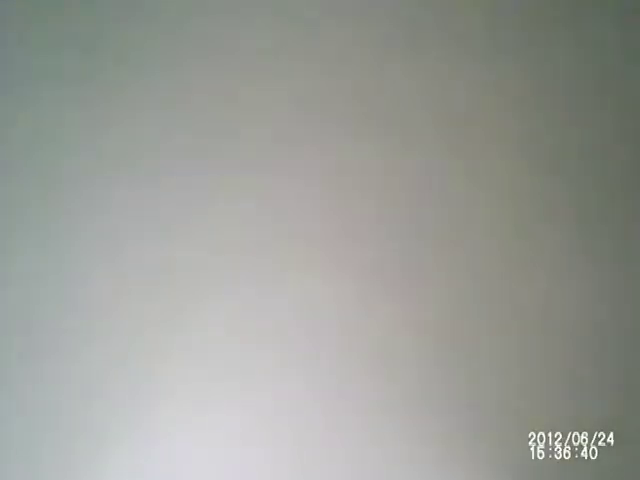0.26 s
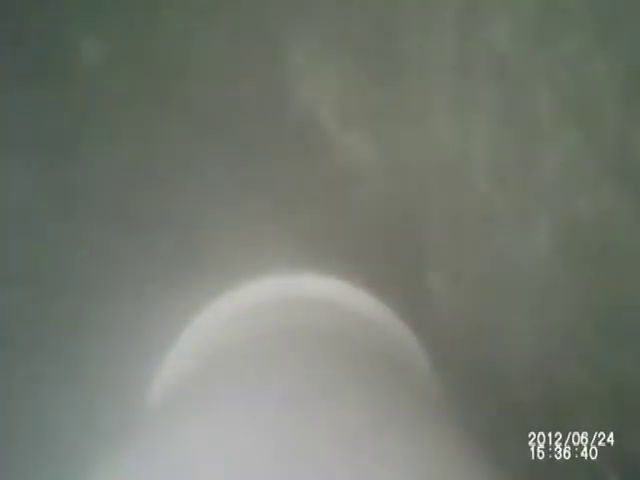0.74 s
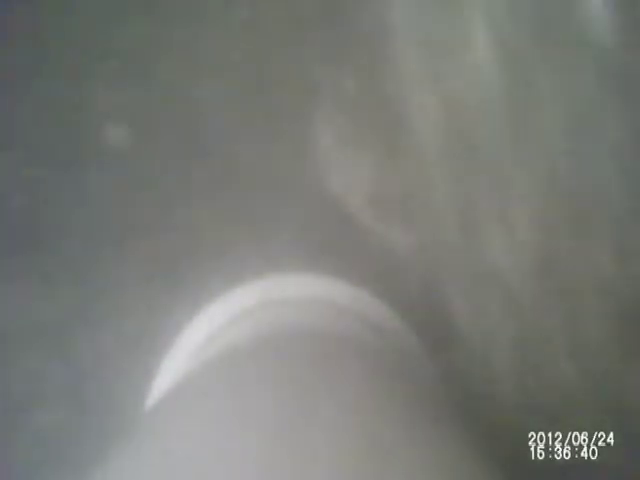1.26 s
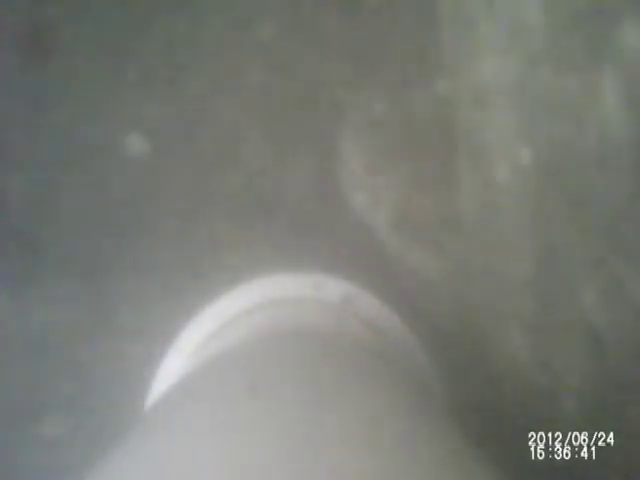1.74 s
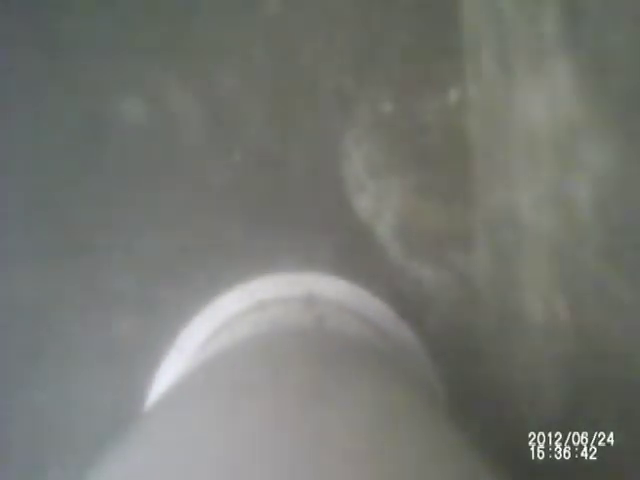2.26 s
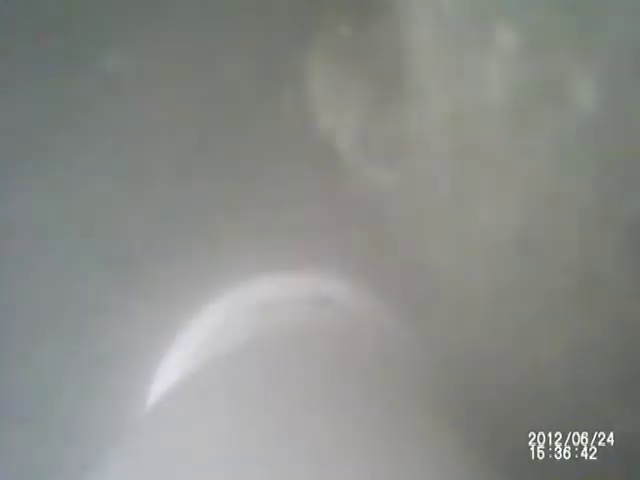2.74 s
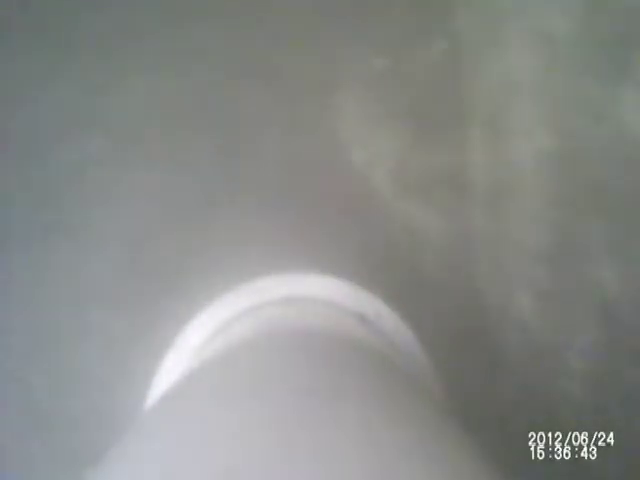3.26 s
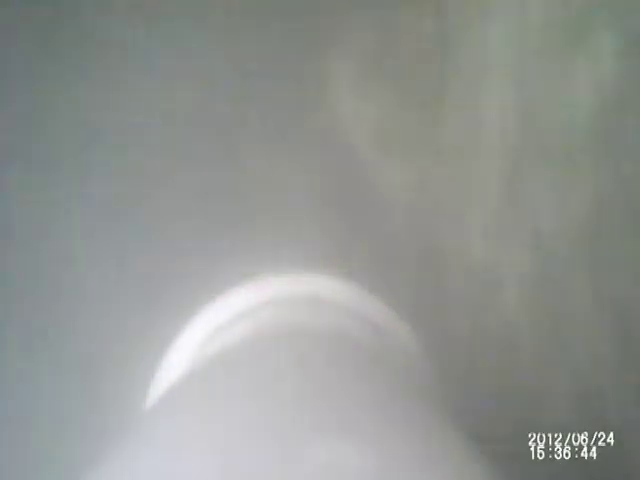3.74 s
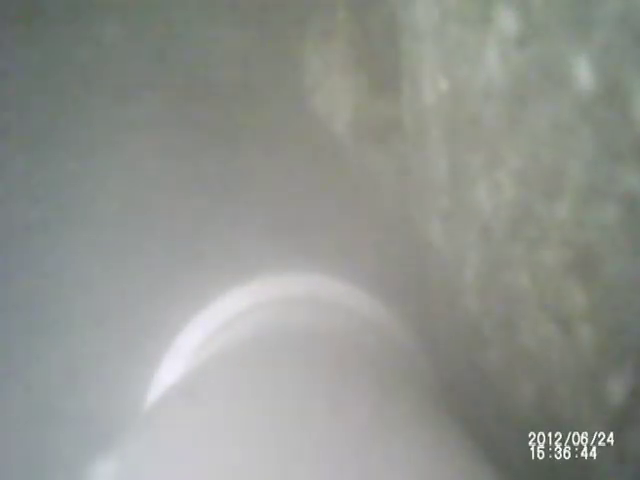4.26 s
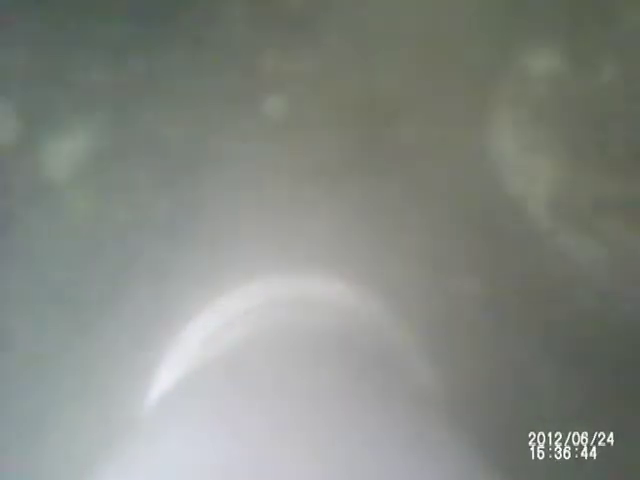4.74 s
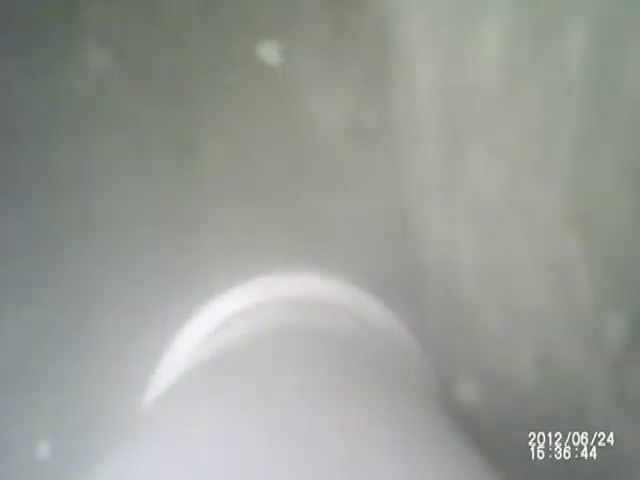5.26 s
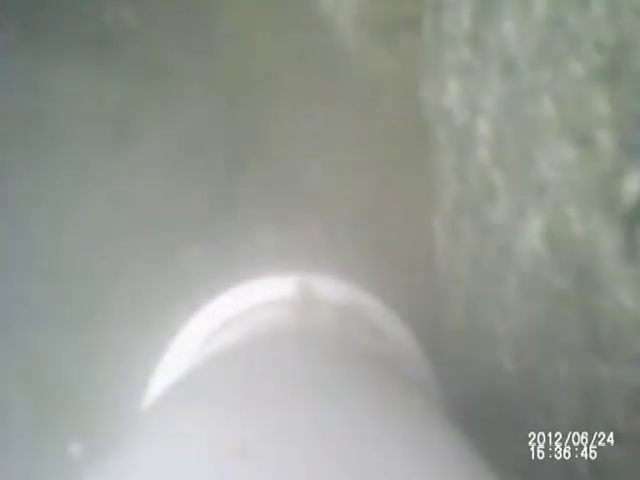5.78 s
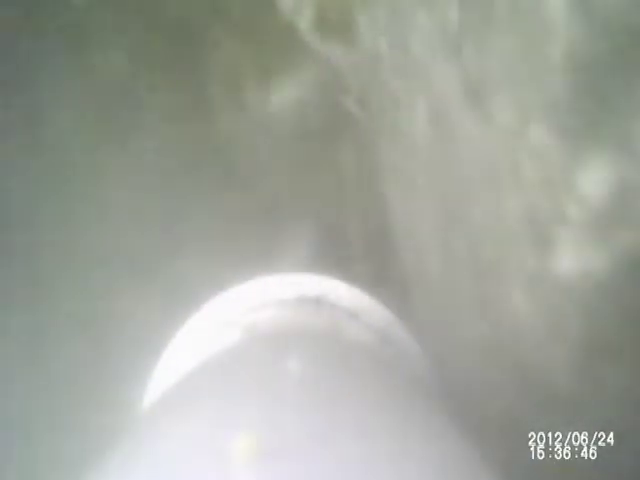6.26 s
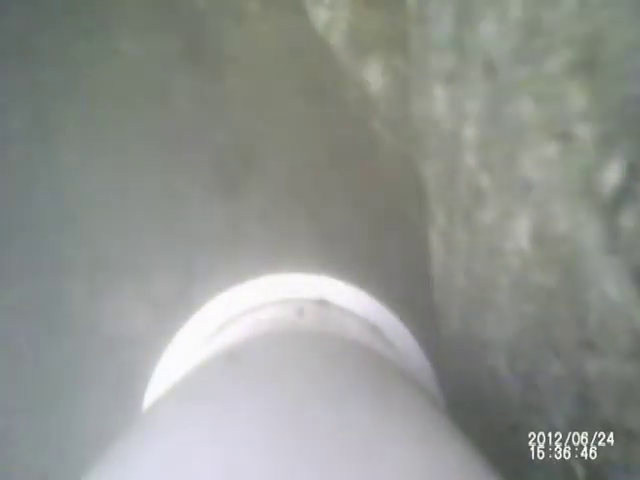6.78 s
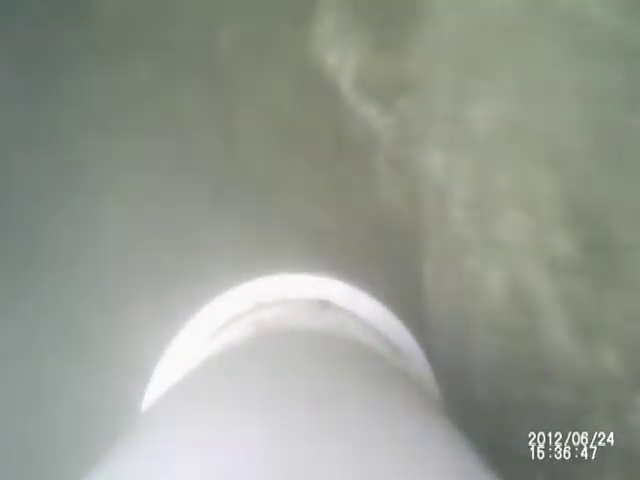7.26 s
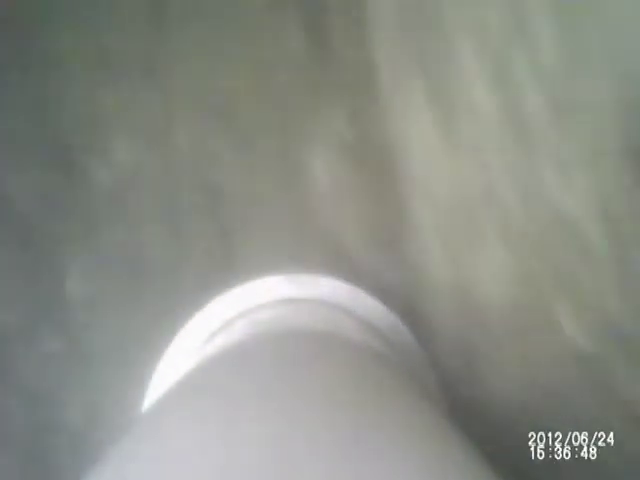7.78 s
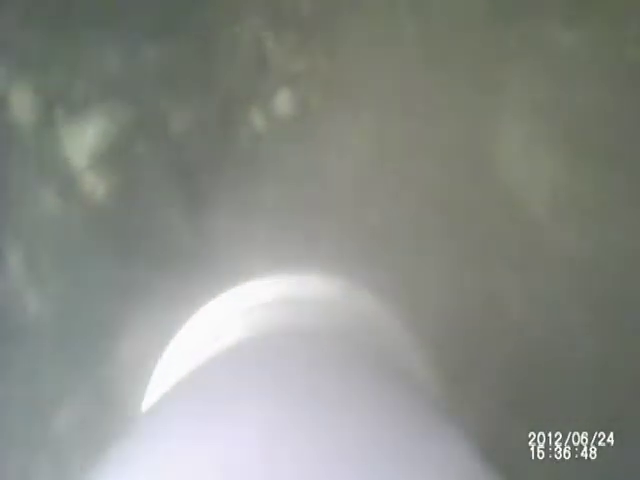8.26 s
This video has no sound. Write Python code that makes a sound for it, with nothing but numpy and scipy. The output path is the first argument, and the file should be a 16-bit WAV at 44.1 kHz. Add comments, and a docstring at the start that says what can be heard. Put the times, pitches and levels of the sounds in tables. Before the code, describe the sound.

Close, muffled and gritty underwater sound from a small camera on a metal pipe: stones tick sharply, rocks clack and thud, and loose gravel rattles upward in uneven mouthfuls. Sparse at first, it becomes almost continuous and crackling with overload, eases into separate knocks over softly surging water, and ends abruptly amid another strong clatter. The metallic ringing is short and dry, with a rough narrow-band edge.

```python
"""River bed under water: a steel suction nozzle works the gravel, a small camera is fixed to its pipe.
The rush of water is surging shaped noise; loose gravel rattles up the pipe as random grains ringing its modes.
Pebbles tick and rocks clack, knock and thud: short noise scuffs that ring the modes near a favoured pitch.
The camera takes one microphone at 8000 samples a second, overloads, and joins the samples by straight lines."""
import sys
import numpy as np
from scipy import signal
from scipy.fft import rfft, irfft, next_fast_len
from scipy.io import wavfile
from scipy.ndimage import uniform_filter1d

SR = 44100
rng = np.random.default_rng(int(sys.argv[2]) if len(sys.argv) > 2 else 0)


def wav_out(sig):
    """Save sig, one row per channel (or a flat mono array), as 16-bit PCM at SR to the path in sys.argv[1]."""
    wavfile.write(sys.argv[1], SR, np.round(np.clip(np.atleast_2d(sig).T, -1, 1) * 32767).astype(np.int16))


N = 375732


def gain_of(db):
    """Amplitude factor of a level in dB."""
    return 10 ** (np.asarray(db) / 20)


def evened(x):
    """Scale to an rms of 1."""
    return x / np.sqrt(np.mean(x ** 2) + 1e-20)


def slow_noise(width_samples):
    """Noise averaged twice over a sliding window, rms 1."""
    once = uniform_filter1d(rng.standard_normal(N), width_samples)
    return evened(uniform_filter1d(once, width_samples))


# Spectrum of the water noise. Each row: frequency in Hz, relative density in dB per Hz.
RUSH_SPECTRUM = [(40, -32), (110, -17), (230, -4.5), (450, -18.5), (900, -13.5), (1900, -14), (3200, -12),
                 (4500, -10.5)]
RUSH_DB, SURGE_DB = -46.5, 2.5  # middle level; rms swing of the surge


def rush():
    """Water drawn past the housing: shaped noise whose level surges irregularly."""
    hz = np.fft.rfftfreq(N, 1 / SR)
    point_hz, point_db = np.transpose(RUSH_SPECTRUM)
    shape_db = np.interp(np.log(hz + 1), np.log(point_hz), point_db)
    noise = irfft(rfft(rng.standard_normal(N)) * gain_of(shape_db), N)
    surge = slow_noise(1500)
    return gain_of(RUSH_DB + SURGE_DB * surge) * evened(noise)


# Modes of the flooded pipe and the camera housing.
# Each row: frequency in Hz, relative level in dB, time to fall 60 dB in s.
PIPE_MODES = [(97.9, -10.5, 0.22), (145, -9.5, 0.1), (183.7, -4.5, 0.047), (216.6, -2.5, 0.051),
              (288.7, 1, 0.035), (346.8, -1.5, 0.052), (409.7, 4, 0.066), (500.4, -0.5, 0.04),
              (651.7, 3, 0.0181), (829, 1.5, .022), (1028, -2.5, 0.0172), (1279, -9.5, 0.036),
              (1650, 10, 0.0072), (1950, 7.5, 0.017), (2183, 5, 0.011), (2511, -1, 0.019),
              (3304, 16, 0.0072), (3800, -2, 0.035)]
MODE_HZ, MODE_DB, MODE_T60_S = np.array(PIPE_MODES).T[:, :, None]


def rings(length_s, detune):
    """One dying sine for each mode; the spot that is hit shifts each mode a little."""
    t = np.arange(round(length_s * SR)) / SR
    decay = gain_of(MODE_DB - 60 * t / MODE_T60_S)
    return decay * np.sin(2 * np.pi * MODE_HZ * detune * t)


def ring_length_s(hz):
    """40 cycles, at most 0.15 s."""
    return min(40 / hz, .15)


# Mouthfuls of gravel sucked up the pipe.
# Each row: start of full flow in s, swell in s, hold in s, dying in s,
# fine grit level in dB, middling level in dB, coarse rumble level in dB.
LOADS = [(0.482, .15, 0.066, 0.33, -68, -58, -54), (0.863, 0.16, 0.048, 0.1, -50, -44, -35),
         (1.02, 0.099, 0.21, 0.18, -45, -40, -47), (1.212, .03, 0.028, 0.2, -25, -18, -27),
         (1.246, 0.04, .02, 0.15, -17.5, -16.5, -30), (1.356, 0.065, 0.062, 0.34, -32.5, -34, -35.5),
         (1.751, 0.017, 0.016, 0.04, -16, -13.5, -16.5), (1.818, 0.047, 0.079, 0.1, -37.5, -38, -46),
         (2.03, 0.045, 0.013, 0.031, -13, -12, -22), (2.22, 0.48, 0.089, 0.34, -32.5, -32, -37.5),
         (2.467, 0.12, 0.018, 0.046, -27.5, -41, -26.5), (2.669, 0.058, 0.077, 0.22, -14.5, -18, -22.5),
         (2.823, 0.24, 0.024, 0.18, -13.5, -19.5, -25), (2.956, 0.14, 0.036, 0.14, -28.5, -39, -23.5),
         (3.05, 0.054, 0.042, 0.26, -23, -20, -27), (3.216, 0.41, 0.017, 0.82, -18.5, -23, -25.5),
         (3.607, 0.13, 0.13, 0.21, -36, -31, -50), (3.811, 0.058, 0.11, 0.11, -13.5, -23.5, -20.5),
         (4.102, 0.1, 0.022, 0.36, -35, -29.5, -37), (4.32, 0.24, 0.2, 0.23, -31.5, -39.5, -36),
         (4.665, 0.48, 0.044, 0.19, -32.5, -36.5, -37), (4.932, 0.099, 0.016, 0.054, -18.5, -17, -36),
         (5.019, 0.078, 0.024, 0.051, -24, -24, -36), (5.116, 0.12, 0.16, 0.4, -36.5, -35.5, -27),
         (5.805, .4, 0.022, 0.061, -39, -57, -41), (5.937, 0.31, 0.021, 0.14, -39, -32, -40),
         (6.152, .25, 0.022, 0.46, -32, -33.5, -27), (6.487, 0.038, 0.016, 0.024, -30.5, -28, -20),
         (6.54, 0.14, 0.44, 0.66, -46.5, -49.5, -44), (7.243, 0.088, 0.02, 0.49, -39, -38, -39),
         (7.596, 0.069, .02, 0.11, -45.5, -58, -55), (7.771, 0.1, 0.024, 0.44, -39.5, -42.5, -37.5),
         (8.233, 0.11, .1, .2, -44.5, -48, -40.5), (8.367, 0.074, 0.033, 0.12, -22.5, -17, -22.5),
         (8.453, 0.027, 0.017, 0.35, -17.5, -21, -28)]
# Gravel that never stops: grit level in dB, middling level in dB, rumble level in dB.
TRICKLE_DB = [-59, -58, -64]
GRIT, MIDDLING, RUMBLE = 0, 1, 2  # size index
LOAD_DEPTH_DB = 30  # fall over one swell or dying time


def gravel_level(size):
    """Each mouthful swells, holds and dies away; their powers add over a thin trickle."""
    t = np.arange(0, N / SR + .01, .002)
    power = np.full(len(t), gain_of(2 * TRICKLE_DB[size]))
    for full_s, swell_s, hold_s, dying_s, *sizes_db in LOADS:
        before = np.maximum((full_s - t) / max(swell_s, .01), 0)
        after = np.maximum((t - full_s - hold_s) / max(dying_s, .01), 0)
        away = np.minimum(before + after, 5)
        power += gain_of(2 * (sizes_db[size] - LOAD_DEPTH_DB * away))  # doubled dB: power
    return np.interp(np.arange(N) / SR, t, np.sqrt(power))


def rattle(size, low_hz, high_hz, per_s, spread_db, clumps_db, detune=0.051):
    """Random grains of unequal strength, each landing on one of six spots and ringing one range of modes."""
    spots = 6
    grain_db = clumps_db + spread_db * np.minimum(rng.exponential(1, N), 4)
    grains = gain_of(grain_db) * (rng.random(N) < per_s / SR)
    spot = rng.integers(0, spots, N)
    in_range = (MODE_HZ > low_hz) * (MODE_HZ < high_hz)
    out = np.zeros(N)
    for k, (sign, shift) in enumerate(rng.standard_normal((spots, 2, len(PIPE_MODES), 1))):
        modes = rings(ring_length_s(low_hz), 1 + detune * shift)
        ring = (np.sign(sign) * in_range * modes).sum(0)
        out += signal.oaconvolve(grains * (spot == k), ring)[:N]
    return evened(out) * gravel_level(size)


THICK_DB, EVENED_SHARE = -32, .6  # grit level of a half-thick flow; bunching lost in a fully thick one
SPARKLE_DB, THIN_SPARKLE = -4.5, 0.77  # brightest grit against the grit; share left in a thin flow
HUM_DB = -1  # 380-580 Hz range against the rumble level


def gravel():
    """Five mode ranges rattle together; a thick flow bunches less and sparkles more."""
    thick = 1 / (1 + gain_of(THICK_DB) / gravel_level(GRIT))
    clumps = slow_noise(200) * (1 - EVENED_SHARE * thick)
    sparkle = gain_of(SPARKLE_DB) * (THIN_SPARKLE + (1 - THIN_SPARKLE) * thick)
    grit = rattle(GRIT, 1200, 2400, per_s=3600, spread_db=7.0, clumps_db=5.7 * clumps)
    bright = rattle(GRIT, 2400, 4000, per_s=2400, spread_db=6.0, clumps_db=5.6 * clumps)
    middling = rattle(MIDDLING, 580, 1200, per_s=1500, spread_db=5.0, clumps_db=4.5 * clumps)
    hum = rattle(RUMBLE, 380, 580, per_s=600, spread_db=4.5, clumps_db=4.2 * clumps)
    rumble = rattle(RUMBLE, 50, 380, per_s=430, spread_db=3.5, clumps_db=9.6 * clumps)
    return grit + sparkle * bright + middling + gain_of(HUM_DB) * hum + rumble


# Heavy rocks. Each row: time of the clack in s, clack level in dB, knock level in dB, thud level in dB,
# lag of the thud in ms, time to press home in ms.
ROCKS = [(0.3527, -9.5, -8, -2.5, 3.5, 1.66), (0.3754, -14, -12.5, -16, 0.69, 1.05),
         (0.8079, -8.5, -7.5, 2.5, 3.35, 1.14), (0.9276, -16, -26, -17, 0.52, 0.96),
         (1.0154, 0.0, -27.5, -6.5, 9.1, 1.2), (1.1464, -7.5, -28, -16, 1.5, 1.6),
         (1.1821, -1, -5.5, -10, 7.9, 1.5), (1.2165, -2.5, -17, -11, 7.6, 1.5),
         (1.2736, -4.0, -30, -34, 1, 1.4), (1.4011, -14.0, -16, -19.5, 1.9, 0.7),
         (1.4559, -37, -18.0, -32, 1.1667, 1.6), (1.7233, -8.5, -8.5, -5, 3.7, 0.89),
         (1.7543, -0.5, -13, -10.5, 0.6, 1.8), (1.9269, -8, 2.5, -4.0, 1.3, 1.23),
         (1.9578, -6, -5.5, -8.5, 1, 1.48), (1.9955, -3.0, -20, -24, 1.5, 2.4),
         (2.0341, -1, -25, -8, 0.73, 1.45), (2.2534, -11, -20, -37, 4.9, 2.06),
         (2.3522, -12, -44, -45, 1, 1.1), (2.7041, 3.5, -1.5, -8, 1.53, 0.43),
         (2.7445, -7.0, -4, -24, 4.7, 0.48), (2.7612, -1, -2, -7.0, 11.2, 0.96),
         (2.8021, -7, -19, -2, 0.67, 1.88), (2.8498, 6, -14, -22, 3.6, 0.91),
         (2.8717, 0.5, -23, -26.0, 11.7, 1.17), (2.8997, -0.5, -5.5, -4.0, 5.5, 0.82),
         (2.9922, -15.0, -6.5, -8, 5.5, 2), (3.0132, -2.0, 5.5, 2, 3.1, 1.52),
         (3.0508, -3, -22, -17, 5.8, 1.1), (3.0802, 1.0, -29, -10, 13, 1.8),
         (3.1037, -19, -14, -12, 4.7, 1.5), (3.6317, -16, -8.5, -0.5, 4.9, 1.2),
         (3.7128, -3.5, -26, -35, 3.6, 0.52), (3.7587, -10, -6.5, -38, 0.86, 1.9),
         (3.8098, -0.5, 2, -6.0, 2.5, 1.03), (3.8552, -25, -2, -2.5, 4.4, 0.96),
         (3.8859, -12, -5, 0, 0.73, 0.67), (3.9096, -20, -16, -28, 5.2, 1.2),
         (3.9418, -6.5, -21, -35, 1.6, 2), (3.9899, -21, -28, -37, 2.2, 1.1),
         (4.1049, 7, 13, 10, 1.26, 2.53), (4.1443, -17, -9.5, -12, 3.1, 2.2),
         (4.2331, -5.5, -25, -30, 2.2, 1.1), (4.8171, -1.5, -20, -32, 4.4, 1.6),
         (4.8285, 11, -0.5, -4.5, 7.6, 1.4), (4.9248, -14, -28, -37, 1.2, 1.9),
         (4.9473, -2.5, -11, -15, 10, 1.26), (4.9807, -3, -23, -17.0, 4.1, 1.4),
         (5.0131, 2, -8, 4, 3.64, 1.237), (5.0503, -6, -8, -7, 1.2, 1.7), (5.3997, -12, -2, 2.5, 1, 0.9),
         (5.733, -22.5, -21, -18, 3, 2.3), (5.7758, -22, -15.0, -13.5, 5.6, 0.41),
         (5.8155, -18.0, -18.5, -14, 3.8, 2.4), (5.954, -9.5, -26, -22.0, 11, 2.9),
         (6.082, -22, -28, -10.5, 3.4, 3.2), (6.1081, -6.5, -4.5, -15, 6, 0.81),
         (6.2573, -18, -1, 0, 3.8, 1.35), (6.4386, -1, 4, 0, 9.1, 0.87), (6.4875, -7.5, -9, -8.5, 5.8, 0.9),
         (6.509, -15, -29, -8.5, 1.3, 0.81), (6.609, -27, -20, -44, 2.1, 0.75),
         (6.7574, -23, -31, -11.5, 7.4, 0.87), (7.2168, -20, -16, -28, 3.4, 3.6),
         (7.2358, -8.0, -11.0, -11, 6.8, 0.96), (7.5518, -7, -3.5, -6.5, 6.2, 1.7),
         (7.5893, -7.5, -19, 2.5, 4, 1.87), (7.7716, -20, -14.5, -15.0, 8.7, 1.74),
         (7.9075, -16.5, -7.5, -13.0, 0.73, 0.4), (8.1166, 4, -3, -0.5, 4.7, 1.19),
         (8.3548, 0.0, -7, -25.0, 10.4, 2.4), (8.381, 2, -23, -8, 1.4, 1.13),
         (8.4184, 8.5, -5, -8, 17.4, 1.43), (8.4653, 11, -4.5, -3, 2, 1.06),
         (8.489, -7, -2.5, -23.0, 0.99, 2.1)]
CLACK_HZ, KNOCK_HZ, THUD_HZ = 856, 397, 192.2
KNOCK_SHARE = 0.613  # knock time as a share of the thud lag


def rock_blows():
    """Every rock is three blows, each lower and later."""
    blows = []
    for s, clack_db, knock_db, thud_db, lag_ms, press_ms in ROCKS:
        lag_s = lag_ms / 1000
        blows.append((s, clack_db, CLACK_HZ, press_ms))
        blows.append((s + KNOCK_SHARE * lag_s, knock_db, KNOCK_HZ, press_ms))
        blows.append((s + lag_s, thud_db, THUD_HZ, press_ms))
    return blows


# Sharp ticks of stone on steel, one blow each.
# Each row: loudest moment in s, envelope peak in dB, favoured pitch in Hz, time to press home in ms.
TICKS = [(0.3544, -0.5, 2010, 1.11), (0.3754, -18, 2040.0, 0.78), (0.8059, -10.5, 1640, 0.37),
         (0.8244, -16.5, 1790, 0.38), (0.9256, -28, 1700.0, 0.54), (1.0152, -1, 1780, 1.4),
         (1.0371, -21, 1950.0, 0.89), (1.1466, -15, 1920.0, 0.65), (1.1529, -16, 1850, 1.7),
         (1.1816, -6.5, 1810.0, 0.28), (1.2145, -1, 1780, 0.97), (1.2237, -5, 1850, 0.61),
         (1.7236, -14.5, 1930.0, 1.8), (1.7475, -4.5, 1950.0, 0.27), (1.7553, 0.5, 1670, 1.85),
         (1.765, 3, 1750, 0.32), (1.8598, -16.5, 1600, 0.31), (1.9231, -8, 1880, 0.8),
         (1.9578, -7, 1860.0, 0.95), (1.9957, -14, 1710.0, 1.4), (2.0172, -15.0, 1800.0, 1),
         (2.0336, -4.5, 1870, 2.7), (2.0449, -23, 1650.0, 0.62), (2.2544, -14, 1920, 1.3),
         (2.3868, -12, 1900, 1), (2.4013, -14, 1880, 1.1), (2.4557, -19, 1810, 1.4),
         (2.4811, -18, 1950, 0.41), (2.6313, -9.5, 1950.0, 0.9), (2.6577, -35, 2010.0, 0.43),
         (2.6704, -3.5, 1890, 0.62), (2.6959, 5, 2380, 0.23), (2.7031, 7, 2020, 1.5),
         (2.7166, 1, 2120.0, 1.8), (2.7323, 6, 2080.0, 0.55), (2.746, -10, 1910.0, 0.54),
         (2.7617, 3, 2060, 0.8), (2.7779, 9, 2440, 0.3), (2.7894, 8, 2190, 1.33), (2.8034, 23, 2800, 0.39),
         (2.8188, 16.5, 2450, 2.6), (2.8453, 14, 2560, 0.52), (2.8553, 21, 2110, 1.9),
         (2.8727, 10, 1820.0, 1.1), (2.88, -4.0, 2040.0, 1.4), (2.9054, 8.5, 2660, 1.9),
         (2.9221, 1, 2200, 0.38), (2.9351, 1.5, 2500, 2.6), (2.9618, -3, 1960.0, 1.2),
         (2.9797, 0, 2040, 1.4), (2.9862, -2.5, 1900, 0.57), (2.9924, -2, 1900, 0.43),
         (3.0134, -3, 1660.0, 0.91), (3.0201, 7.5, 2580, 1.3), (3.0391, 1, 2060, 0.49),
         (3.0665, -10.0, 1790.0, 0.66), (3.0798, 0.5, 1670, 0.93), (3.094, -7, 1750.0, 0.64),
         (3.1875, -0.5, 1860, 1.1), (3.2229, -3, 1940.0, 0.89), (3.2351, -5, 1870.0, 0.41),
         (3.2556, 0, 2220, 0.78), (3.2641, -2, 1740, 0.29), (3.3055, -1, 2050.0, 0.36),
         (3.3227, 3.5, 2160, 0.4), (3.3813, -7, 1950.0, 0.55), (3.3935, 1, 1970, 0.92),
         (3.5494, 1, 2130, 1.3), (3.5958, -6.5, 1700, 1.3), (3.634, 1.5, 1880, 0.53),
         (3.6589, -3, 1860, 0.51), (3.6889, -1.5, 1970, 0.52), (3.7043, 5, 1890, 0.57),
         (3.7126, 2, 2100, 0.37), (3.7363, 1, 1810.0, 0.9), (3.7512, 8, 2110.0, 0.38),
         (3.7597, 14.5, 2180, 1.14), (3.7956, 1, 2176, 0.97), (3.8073, 1, 2060.0, 0.37),
         (3.8231, 9.5, 2290.0, 0.69), (3.8308, -2, 2100, 0.73), (3.8862, 13, 2050, 1.3),
         (3.9074, 10, 2320, 1.93), (3.9423, 5, 2100, 0.8), (3.9605, 0.5, 2200, 0.52),
         (3.9902, 6.5, 1920, 1.5), (4.0049, 3, 2100, 0.71), (4.0675, -9, 1900.0, 0.34),
         (4.076, -2, 1900, 0.5), (4.0957, 14, 1800, 0.83), (4.1079, 15, 2040, 1.5),
         (4.1755, -8, 2060, 0.23), (4.19, -15, 2140.0, 0.8), (4.2222, -13, 1950.0, 0.87),
         (4.2329, 2, 1810, 1.8), (4.269, -16, 2070.0, 0.62), (4.297, 0, 2060, 1.47), (4.3132, -5, 2170, 1),
         (4.406, -6.5, 1820, 0.77), (4.4137, -16, 2060.0, 0.68), (4.4362, -2, 2060.0, 1.1),
         (4.4514, 2, 1850, 0.29), (4.4821, 2.5, 1860, 0.28), (4.4963, -22, 1810.0, 0.8),
         (4.5906, -16.0, 1900.0, 0.26), (4.6332, -4.5, 1840, 0.24), (4.6888, -8, 1970.0, 1.05),
         (4.6993, -12.5, 1770, 0.38), (4.8166, 4.5, 1880, 1.08), (4.83, 21, 2540, 0.95),
         (4.9473, 6, 1720.0, 1), (4.9567, 3, 2080, 0.68), (4.9817, 7, 2240, 2.27),
         (5.0136, 8, 2180.0, 1.45), (5.0288, -6, 2060.0, 0.44), (5.0373, -7, 2050, 0.7),
         (5.062, 2, 2980, 0.37), (5.0824, -8, 2250, 0.79), (5.0899, -4.5, 2210, 0.76),
         (5.1278, -12, 2450, 1.36), (5.1575, -11, 1793, 0.38), (5.2421, -19, 1980.0, 0.8),
         (5.2625, -15, 2120.0, 0.67), (5.3102, -10, 1880, 1.2), (5.3942, 5, 2100, 1.54),
         (5.4703, -2.5, 2300, 1.04), (5.5247, -1.5, 2300, 0.33), (5.5624, -18, 1810, 0.85),
         (5.618, -13.5, 2480, 1), (5.6317, -18.5, 1810.0, 0.51), (5.8208, -22, 1920, 0.88),
         (5.8759, -17.5, 1960.0, 0.58), (5.9412, -30, 2040, 0.73), (5.9547, -17, 1890, 1.2),
         (6.0203, -14.5, 2000, 0.89), (6.1091, -7, 2027, 1.5), (6.1822, -10, 1840, 0.54),
         (6.2558, -20, 1650, 0.6), (6.269, -11, 2000, 0.57), (6.3062, -9, 2240.0, 0.52),
         (6.3174, -17, 1980, 1.1), (6.4321, 7.5, 1870, 0.43), (6.4391, 15, 1860, 0.27),
         (6.4883, -10.5, 2560, 0.73), (6.5077, -22.0, 1840.0, 0.91), (6.6092, -17, 1890.0, 0.62),
         (6.6776, -24, 1960.0, 0.57), (6.7399, -34, 1730.0, 0.69), (6.7546, -12, 1690, 0.24),
         (6.8345, -17, 1940.0, 0.8), (6.8464, -12, 2120, 0.7), (6.9861, -19, 2060, 0.42),
         (7.207, -13, 3350, 2), (7.2115, -6.5, 3350, 4.5), (7.2161, -0.5, 3330, 0.87),
         (7.2366, -28, 1920.0, 0.94), (7.5459, 7, 1860, 1.83), (7.5536, 1, 1980, 1.3),
         (7.5888, -12, 1930.0, 0.68), (7.8357, -23, 1830.0, 0.65), (7.9058, -21, 1830, 0.22),
         (8.1168, 1, 1705, 0.37), (8.2934, -15.5, 2020, 0.4), (8.359, 1, 1800, 1.4),
         (8.3787, 5.5, 2100.0, 0.66), (8.4007, 6, 1950, 0.67), (8.4141, 10, 1894, 2.8),
         (8.4201, 14, 2200, 0.55), (8.4391, 3.5, 2310, 0.36), (8.4535, 7, 1740, 1.2),
         (8.4605, 9, 2030, 2.5), (8.485, 1.5, 1770, 2.1)]


def stones(octaves=0.53, scatter_db=-0.03, detune=0.052, skid_db=-25, skid_s=0.0053):
    """Each stone scuffs the steel for a moment and wakes the modes near its favoured pitch."""
    blows = list(TICKS) + rock_blows()
    modes = len(PIPE_MODES)
    out, t = np.zeros(N + SR), np.arange(1200) / SR
    luck = rng.standard_normal((len(blows), 2 * modes + len(t)))
    for (s, peak_db, hz, press_ms), draws in zip(blows, luck):
        strength, shift, grit = np.split(draws, [modes, 2 * modes])
        share = np.exp(-.5 * (np.log2(MODE_HZ[:, 0] / hz) / octaves) ** 2)
        share *= np.sign(strength) * gain_of(scatter_db * abs(strength))
        ring = share @ rings(ring_length_s(hz), 1 + detune * shift[:, None])
        u = 1000 * t / max(press_ms, .45)  # time in press times, none under 0.45 ms
        press = (u * np.exp(1 - u)) ** 2
        # chatter along the wall after the press
        skid = gain_of(skid_db) * grit ** 2 / 3 * np.minimum(u, 1) * np.exp(-t / skid_s)
        sound = signal.fftconvolve(ring, grit * (press + skid))
        envelope = abs(signal.hilbert(sound, next_fast_len(len(sound))))
        at = max(round(s * SR) - envelope.argmax(), 0)
        out[at:at + len(sound)] += gain_of(peak_db) * sound / envelope.max()
    return out[:N]


def scene():
    """Water, gravel and stones summed, the same in both channels."""
    return np.tile(rush() + gravel() + stones(), (2, 1))


SAMPLES_PER_S, EDGE_HZ = 8000, 15700  # camera sampling rate; final band limit
OVERLOAD = .98  # clipping level


def record(dry):
    """Input filter, slow sampling with overload, straight lines (mirror tones above), band limit."""
    t = np.arange(N) / SR
    sample_s = np.arange(N * SAMPLES_PER_S // SR + 2) / SAMPLES_PER_S
    heard = signal.sosfilt(signal.butter(3, 105, "high", fs=SR, output="sos"), dry[0])
    heard = signal.oaconvolve(heard, signal.firwin(numtaps=49, cutoff=3800, fs=SR), "same")
    samples = np.clip(np.interp(sample_s, t, heard), -OVERLOAD, OVERLOAD)
    joined = np.interp(t, sample_s, samples)
    band_limit = signal.firwin(511, EDGE_HZ, window=("kaiser", 9), fs=SR)
    return np.tile(signal.oaconvolve(joined, band_limit, "same"), (2, 1))


dry = scene()
out = record(dry)
wav_out(out)
```